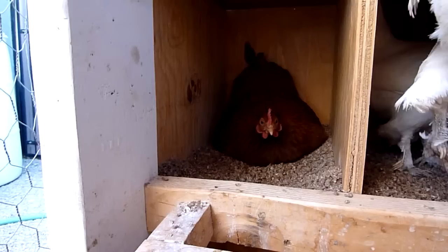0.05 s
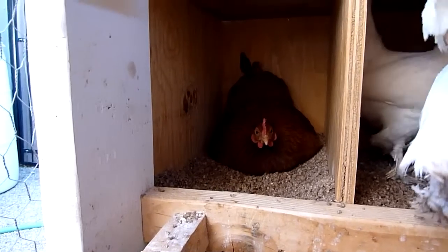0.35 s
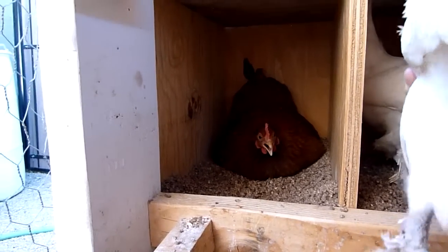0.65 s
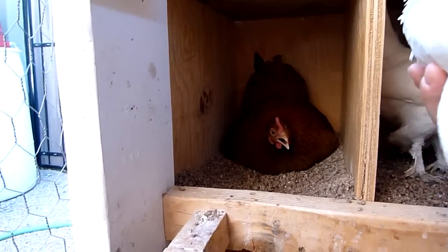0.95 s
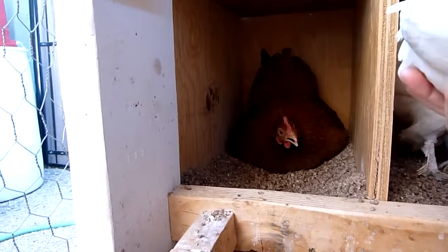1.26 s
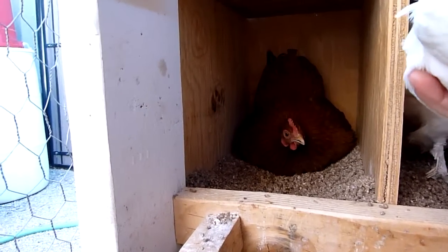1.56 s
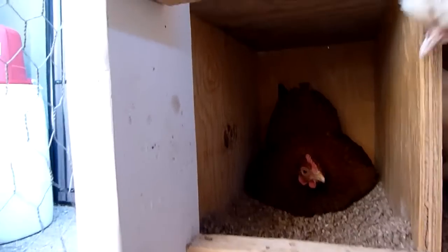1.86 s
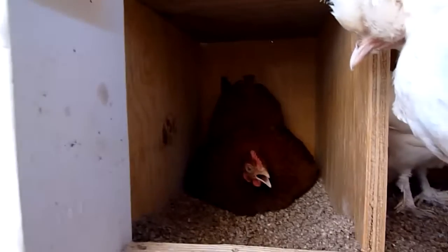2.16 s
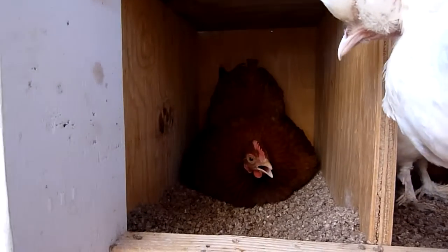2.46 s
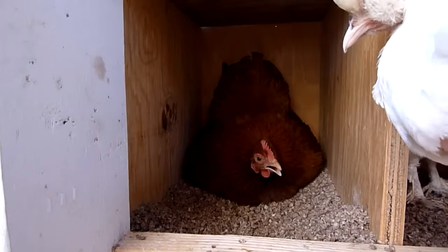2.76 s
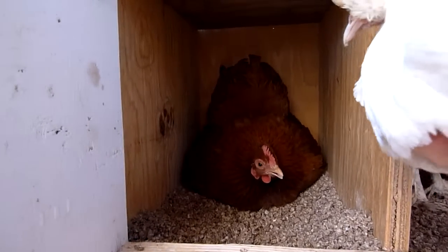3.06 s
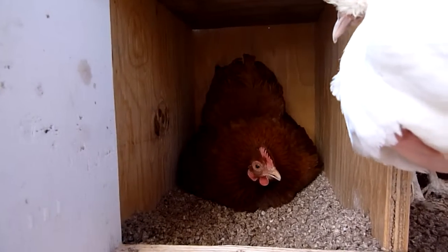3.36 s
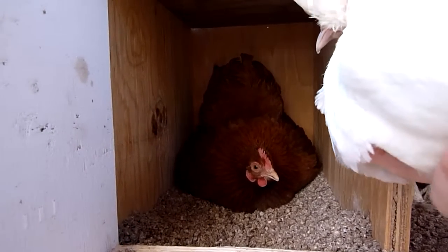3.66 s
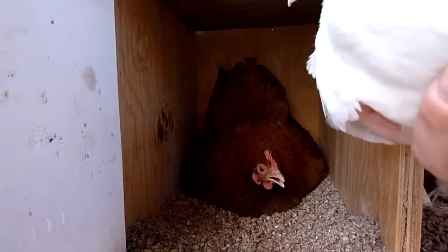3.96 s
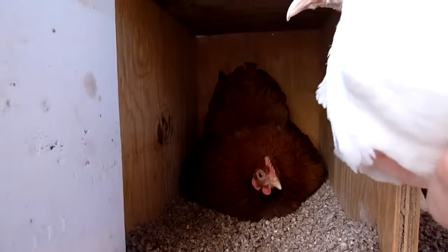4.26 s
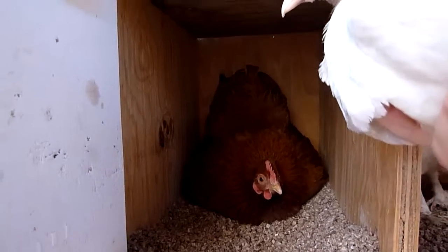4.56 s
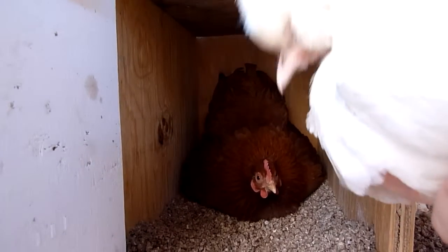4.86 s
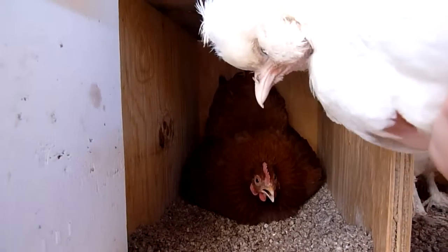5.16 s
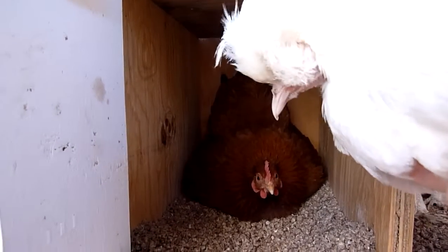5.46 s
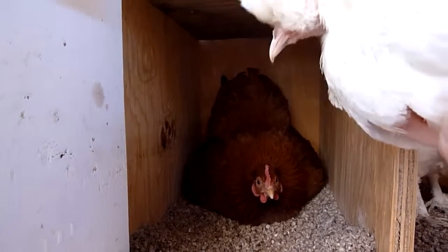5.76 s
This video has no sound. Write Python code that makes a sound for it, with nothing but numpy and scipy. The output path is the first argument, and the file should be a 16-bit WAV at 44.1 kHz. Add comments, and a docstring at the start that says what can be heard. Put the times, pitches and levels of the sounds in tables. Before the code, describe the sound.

Steady airy hiss fills a coop while a hen, close to the microphone, protests from her wooden nest box. First comes a shrill, wobbling squeal, then a longer, raspier one. Quick rattles and brief harsh squawks follow, dropping into a low pulsing growl. After a pause she squawks and growls again, trailing off into clucks. The box gives her voice a slight, tight echo.

```python
"""A broody hen warns an intruder off her plywood nest box, over the hiss and low murmur of coop air.
0.6 s and 1.9 s: two long squeals, a high wobbling syrinx tone that breaks into rasp.
From 3 s: short squawks amid fast rattles of her low voice, whose pitch sags in every throb.
4 s and 5.2 s: two slow, throbbing growls that sink and fade into clucks.
The box adds close echoes throughout."""
import sys
import numpy as np
from scipy import signal
from scipy.fft import rfft, irfft
from scipy.io import wavfile
from scipy.ndimage import uniform_filter1d

SR = 44100
rng = np.random.default_rng(int(sys.argv[2]) if len(sys.argv) > 2 else 0)


def transcribe(u):
    """Save the signal u as a 16-bit wav file named by the first command-line argument.

    u: samples, shape (n,) or (channels, n), limited to [-1, 1]; the rate is SR.
    q: integer samples, one column per channel.
    """
    v = np.clip(np.atleast_2d(u).T, -1, 1)
    q = np.round(v * 32767).astype(np.int16)
    wavfile.write(sys.argv[1], SR, q)


N = 265041
T = np.arange(N) / SR
BIN_HZ = np.fft.rfftfreq(N, 1 / SR)


def squeal(throb_power, throb_hz):
    """High voice: a wobbling syrinx tone, second harmonic on the throat resonance, breaking into rasp."""
    # throat response: (frequency [Hz], gain [dB])
    throat = [(1000, -24), (1700, -4.5), (2250, -9.5), (2700, 4), (3400, 5), (4400, 5.5), (4850, -7),
              (5700, -2.5), (6800, -52), (8400, -10.5), (11000, -41)]
    # bright edge of the rasp: (frequency [Hz], gain [dB])
    edge_spectrum = [(4000, -68), (6800, -45), (7780, -0.5), (8140, 1.5), (8990, -4.5), (9850, -2),
                     (10700, -26), (11200, -16), (13300, -46), (14000, -22), (15800, -20)]
    gate, level_db, pitch_hz, rasp, progress, final_wobble, upper_db, edge_db = cries()
    effort_db = level_db + 20.5  # re an ordinary cry
    wobble = final_wobble * (.15 + .85 * progress)  # the voice loosens
    throat_hz = 3835 + .9 * (pitch_hz - 1970)
    beak_hz = 5792 + 26 * effort_db - 255.4 * progress
    flutter = np.sin(turn(56 * (1 + .28 * waver(40.02))))  # membranes flap near 56 Hz
    # throbs drag a loose squeal down
    drag = throb_power / (throb_power + undb(-32) ** 2) * np.clip(wobble / .047, 0, 1) ** 2
    pitch_hz = pitch_hz + drag * (np.maximum(throb_hz, 1200) - pitch_hz)
    bend = wobble * (flutter + .4015 * waver(145.6)) + .0493 * rasp * waver(677)
    phase = turn(pitch_hz * (1 + bend))
    buzz = undb(-22 * rasp) * np.sin(phase) + sum(np.sin(k * phase) for k in range(2, 6))
    tone = colour(buzz, throat)
    tone = tone / np.sqrt(uniform_filter1d(tone ** 2, size=1300))
    puffs = noise() * (1 + .85 * np.cos(phase))  # one a cycle, ringing the throat
    hoarse = (moving_band(throat_hz, 960) + undb(-12) * resonate(puffs, 2507, 700)
              + undb(-18) * resonate(puffs, 3046, 540))
    upper = moving_band(beak_hz, 690) + undb(-4) * resonate(puffs, 5040, 1400)
    edge = (undb(-4) * moving_band(1.41 * beak_hz, 810) + undb(-2) * unit(colour(puffs, edge_spectrum))
            + undb(-9.5) * resonate(puffs, 11340, 7200))
    treble = undb(upper_db - 10) * rasp ** .5 * upper + undb(edge_db - 9.5) * rasp ** .82 * edge
    treble *= undb(-.45 * effort_db)  # swells less than the main resonance
    push = throb_power + undb(-31) ** 2
    spurts = unit(undb(waver(240))) * (push / uniform_filter1d(push, size=1100)) ** .2
    shake_db = (1.4 * flutter + 2.5 * waver(71)) * np.clip(wobble / .036, 0, 1)
    voice = np.sqrt(1 - rasp) * tone + spurts * (np.sqrt(rasp) * hoarse + treble)
    return gate * (undb(level_db + shake_db) * voice + drone(effort_db, rasp))


def cries(squawk_rise_db=13.5, squawk_rasp=.842, squawk_wobble=.035):
    """Per-sample controls of the high voice, over all squeals and squawks."""
    # one curve a squeal: (time [s], level [dB], pitch [Hz], rasp [0-1])
    squeals = [
        [(0.643, -13, 2130, 0.6), (0.7, -21.5, 2285, 0.16), (0.855, -16.5, 2153, 0.06),
         (0.945, -16.5, 1960, 0.34), (1.055, -22, 2018, 0.15), (1.158, -16, 2045, 0.07), (1.2, -31, 1825, 0.62),
         (1.25, -32, 1785, 0.82)],
        [(1.884, -26.5, 1598, .35), (1.903, -19, 1900, 0.13), (1.925, -24, 2029, 0.14),
         (1.97, -25.5, 2020, .04), (2.06, -15, 2073, 0.51), (2.25, -19, 1750, 0.77), (2.5, -21.5, 1850, 0.85),
         (2.6, -20, 2041, 0.47), (2.92, -19, 1969, .33), (2.965, -21.5, 1730, 0.28), (2.995, -29, 1650, 0.91)],
    ]
    # timbre of each squeal: (final wobble [fraction of pitch], upper resonance [dB], bright edge [dB])
    timbres = [(.066, 1.5, 0), (.024, -0.5, 2)]
    # raspy squawks: (start [s], peak [s], end [s], peak level [dB], fade [dB], pitch [Hz],
    # upper resonance [dB], bright edge [dB])
    squawks = [(2.996, 3.016, 3.18, -28, -4.5, 2310, -1.5, -5.5),
               (3.705, 3.725, 3.77, -31, -6, 1800, -0.5, -2.5),
               (3.852, 3.873, 4.009, -15, -21, 1977, 4.5, -1.5),
               (5.11, 5.16, 5.212, -17, -14.5, 1697, -5.5, -10)]
    curves = list(zip(squeals, timbres))
    for start_s, peak_s, end_s, db, fade_db, hz, upper_db, edge_db in squawks:
        envelope = [(start_s, db - squawk_rise_db), (peak_s, db), (end_s, db + fade_db)]
        curve = [(s, level_db, hz, squawk_rasp) for s, level_db in envelope]
        curves.append((curve, (squawk_wobble, upper_db, edge_db)))
    gate, rows = np.zeros(N), []
    for curve, timbre in curves:
        start_s, end_s = curve[0][0], curve[-1][0]
        gate += uniform_filter1d(1. * ((T > start_s) & (T < end_s)), size=200)
        for row in curve:
            progress = (row[0] - start_s) / (end_s - start_s)
            rows.append((*row, progress, *timbre))
    times_s, *columns = np.transpose(sorted(rows))
    return gate, *(np.interp(T, times_s, column) for column in columns)


def drone(effort_db, rasp, pitch_hz=1185):
    """The low voice joins a hoarse cry: a rough note with a weak half-pitch line, steadier with rasp."""
    phase = turn(pitch_hz * (1 + .09 * (1.1 - rasp) * waver(270)))
    tone = unit(np.sin(phase) + undb(-12) * np.sin(phase / 2))
    hoarse = resonate(noise(), 1315, 400) + undb(-9) * resonate(noise(), 802, 530)
    gain = rasp ** 1.02 * undb(-29.5 + .42 * effort_db + 3.2 * waver(65))
    return gain * (undb(-1.1) * rasp * tone + undb(-2) * hoarse)


def growl(power, pitch_hz):
    """Low voice: five harmonics of an unsteady pitch, with a puff of air in each cycle."""
    # throat response: (frequency [Hz], gain [dB])
    throat = [(300, -21), (500, 4), (650, 12), (850, -6.5), (1200, 10.5), (1500, 4.5), (1750, -55),
              (2050, -11.5), (2700, -4), (4200, -14), (6500, -26)]
    pitch_hz = pitch_hz * (1 + .055 * waver(113.3) + .0503 * waver(324.7))
    phase = turn(pitch_hz)
    order = np.arange(1, 6)[:, None]
    weight = gain_at(order * pitch_hz, throat) * undb(-6 * np.log2(order))
    tone = unit((weight * np.sin(order * phase)).sum(axis=0) / np.sqrt((weight ** 2).sum(axis=0)))
    roughness = unit(undb(1.06 * waver(196)))
    puffs = noise() * (1 + .9 * np.cos(phase))
    # tight, high throbs are hoarser
    hoarse = undb(-6) * (pitch_hz / 800) ** 1.3 * moving_band(680 + .45 * pitch_hz, 726)
    fizz = (undb(-19.5) * resonate(puffs, 5360, 1100) + undb(-20) * resonate(puffs, 4380, 600)
            + undb(-25.5) * resonate(puffs, 2750, 920))
    return np.sqrt(power) * undb(-1) * roughness * (tone + hoarse + fizz)


def throbbing(taut_hz=1480, swoop=.19, snap=.08):
    """Low-voice power and pitch: each throb swings the membranes wider; pitch sags and springs back."""
    # fast runs of throbs: (first beat [s], last beat [s], first level [dB], last level [dB],
    # first pitch [Hz], last pitch [Hz])
    rattles = [(0.926, 0.984, -31, -30, 1375, 1342), (2.764, 2.784, -29, -25.5, 1139, 1120),
               (2.968, 3.002, -31, -27.5, 1321, 1150), (3.02, 3.129, -21.5, -22.5, 933.5, 896),
               (3.148, 3.198, -22, -16.5, 804, 572), (3.712, 3.769, -28, -32, 1091, 1247),
               (3.828, 3.862, -27.5, -21, 700, 698), (3.899, 3.977, -24, -22, 980, 718.5),
               (4.985, 5.004, -28.5, -32, 850.6, 1146), (5.082, 5.136, -36.5, -22, 638, 679.4)]
    # slow, deep runs: columns as in rattles
    growls = [(4.022, 4.222, -17.5, -21.5, 668, 553), (5.231, 5.435, -18.5, -20, 612, 570.8)]
    # single throbs: (time [s], level [dB], half length [s], pitch [Hz])
    clucks = [(0.645, -31.5, .011, 622.6), (1.023, -28.5, 0.0062, 1138), (1.181, -30.5, 0.0094, 920.3),
              (1.234, -22.5, 0.0085, 858.8), (2.91, -27.5, 0.0098, 1305), (3.877, -17.5, 0.011, 947),
              (4.257, -30, 0.0053, 503), (4.966, -25, 0.0055, 838), (5.025, -27, 0.0082, 687),
              (5.154, -18.5, 0.00691, 1103), (5.176, -19.5, .015, 762.6), (5.474, -25.5, 0.0083, 635),
              (5.494, -28, 0.0062, 517), (5.522, -21, 0.013, 503)]
    throbs = [*beats(rattles, rate_hz=54, base_half_s=.0063),
              *beats(growls, rate_hz=19.7, base_half_s=.0112, hurry=.11, lengthen=.35), *clucks]
    power, pull, weighted_hz = np.zeros((3, N))
    for s, db, half_s, hz in throbs:
        span = slice(int((s - 3 * half_s) * SR), int((s + 3 * half_s) * SR))
        age = (T[span] - s) / half_s
        skewed = np.abs(age) * (1 - snap * np.sign(age))  # rise faster than fall
        bump = undb(db) ** 2 * np.exp(-1.75 * skewed ** 2.6)
        sag_hz = np.minimum(hz * (1 + swoop * ((age - .22) ** 2 - .2)), taut_hz)
        power[span] += bump
        pull[span] += bump ** 2
        weighted_hz[span] += bump ** 2 * sag_hz
    rest_pull = undb(-43) ** 4
    return power, (weighted_hz + rest_pull * taut_hz) / (pull + rest_pull)


def beats(runs, rate_hz, base_half_s, hurry=0, lengthen=0):
    """Throbs along sliding runs: (time [s], level [dB], half length [s], pitch [Hz])."""
    for first_s, last_s, first_db, last_db, first_hz, last_hz in runs:
        for progress in np.linspace(0, 1, round((last_s - first_s) * rate_hz) + 1):
            scatter_db, detune = rng.standard_normal(2)
            db = first_db + (last_db - first_db) * progress + scatter_db
            hz = (first_hz + (last_hz - first_hz) * progress) * (1 + .0245 * detune)
            half_s = base_half_s * (1 + lengthen * progress) * 2 ** ((db + 25) / 24)  # louder: longer
            hurried = progress + hurry * progress * (1 - progress)  # slow start, fast end
            yield first_s + (last_s - first_s) * hurried, db, half_s, hz


def hen():
    """Both voices through the windpipe; so small a throat radiates no bass."""
    # windpipe resonances and valleys: (frequency [Hz], gain [dB])
    windpipe = [(1550, -1.5), (1780, -8), (2100, 5), (2500, -4.5), (2650, -8), (2740, -6.5), (2880, -1),
                (3130, -3), (3450, -1.5), (4400, -1), (4720, -6), (5050, 1)]
    power, pitch_hz = throbbing()
    voices = squeal(power, pitch_hz) + growl(power, pitch_hz)
    return colour(butter(voices, 4, 380, "high"), windpipe)


def litter_ticks():
    """Dry, quickly fading scuffs in the litter."""
    # scuffs: (time [s], level [dB], decay [s])
    ticks = [(0.258, -39, 0.016), (1.751, -23.5, 0.0022), (4.627, -51, .015)]
    grit = resonate(noise(), 3200, 15000)
    envelope = sum(undb(db) * (T >= s) * np.exp(-np.abs(T - s) / decay_s) for s, db, decay_s in ticks)
    return butter(grit * envelope, 3, 450, "high")


def nest_box(x, tail_db=-21, t60_s=.21):
    """Close plywood echoes and a short tail; the right channel is slightly later and brighter."""
    # wall echoes: (delay [s], level [dB])
    walls = [(.0017, -21), (.0029, -15.5), (.0046, -43), (.0073, -17)]
    # lag of the right channel: (frequency [Hz], phase [rad])
    right_lag = [(100, 0.67), (700, 0.3), (2400, 0.61), (3500, 0.53), (6600, 0.58), (7700, 1.05),
                 (10500, 1.44), (14000, 1.9)]
    echoes = sum(undb(db) * phase_lag(x, 2 * np.pi * BIN_HZ * s) for s, db in walls)
    near = (x + echoes) * undb(1.71)
    lagged = phase_lag(near, np.interp(BIN_HZ, *np.transpose(right_lag)))
    left = colour(near, [(700, .98), (2400, -.058), (4400, -1.55), (8000, -.13)])
    right = colour(lagged, [(700, .2), (2400, .42), (4400, .24), (8000, 3.5)])
    age_s = T[:SR // 3]
    tails = rng.standard_normal((2, len(age_s))) * undb(-60 * age_s / t60_s) * (age_s > .005)
    tails /= np.sqrt((tails ** 2).sum(axis=1, keepdims=True))
    return np.array([left, right]) + undb(tail_db) * signal.fftconvolve(x[None], tails, axes=1)[:, :N]


def coop_air():
    """Background air: changes colour just before the second squeal, dips during the loudest cries."""
    # air before the change: (frequency [Hz], gain [dB])
    early_spectrum = [(18, -50), (30, -38), (86, -25), (108, -29.5), (271, -0.5), (435, -2.5), (596, -4),
                      (662, 0), (838, -7), (2520, -8), (4490, -10), (6650, -2), (9350, -4), (11500, -16),
                      (15800, -20)]
    # air after it: (frequency [Hz], gain [dB])
    late_spectrum = [(18, -50), (30, -39), (90, -31), (145, -20), (335, -2), (612, -3), (735, -8.5),
                     (1530, -9.5), (1700, -11.5), (2590, -12), (3030, -14.5), (4150, -14.5), (7200, -4),
                     (9350, -9.5), (12800, -12), (15800, -24)]
    # level dips: (start [s], depth [dB], fall [s], recovery [s])
    dips = [(0.62, -5, 0.063, 1.1), (1.98, -14.5, 0.36, 0.45), (3.84, -5, 0.081, .25)]
    late = np.clip((T - 1.72) / .046, 0, 1)
    air = np.sqrt(1 - late) * hiss(early_spectrum, -34.47) + np.sqrt(late) * hiss(late_spectrum, -33.97)
    dip_db = sum(db * np.clip((T - s) / fall_s, 0, 1) * np.exp(-np.maximum(T - s - fall_s, 0) / rise_s)
                 for s, db, fall_s, rise_s in dips)
    return undb(dip_db) * air


def hiss(spectrum, mid_db):
    """Hiss over a wavering murmur; the bass is near centre, the treble wide and leaning right."""
    # stereo width: (frequency [Hz], side gain [dB])
    width = [(60, -4), (130, -13), (300, -18), (700, -4.5), (1400, -4), (3000, -4), (4500, -9.5),
             (8000, -4), (13000, 3)]
    mid = unit(colour(noise(), spectrum))
    side = colour(unit(colour(noise(), spectrum)), width)
    murmur = butter(mid, 2, 700)
    mid = mid + .027 * waver(25) * murmur
    side = side + .085 * murmur - .057 * (mid - murmur)
    return undb(mid_db) * np.array([mid + side, mid - side])


def undb(db):
    """Decibels to gain."""
    return 10 ** (np.asarray(db) / 20)


def unit(x):
    """Scale to rms 1."""
    return x / np.sqrt(np.mean(x ** 2))


def noise():
    """White noise."""
    return rng.standard_normal(N)


def waver(rate_hz):
    """Smooth random drift; rms 1."""
    return unit(butter(noise(), 2, rate_hz))


def turn(hz):
    """Oscillator phase [rad]."""
    return 2 * np.pi * np.cumsum(hz) / SR


def butter(x, order, hz, kind="low"):
    """Maximally flat low- or high-pass."""
    return signal.sosfilt(signal.butter(order, hz, kind, fs=SR, output="sos"), x)


def gain_at(hz, outline):
    """Gain of a (frequency [Hz], gain [dB]) outline."""
    points_hz, db = np.transpose(outline)
    return undb(np.interp(np.log(hz + 1), np.log(points_hz), db))


def colour(x, outline):
    """Filter by a (frequency [Hz], gain [dB]) outline."""
    return irfft(rfft(x) * gain_at(BIN_HZ, outline), N)


def phase_lag(x, lag_rad):
    """Delay each frequency bin by a phase."""
    return irfft(rfft(x) * np.exp(-1j * lag_rad), N)


def resonate(x, hz, width_hz):
    """A resonance applied twice, for steep skirts; rms 1."""
    b, a = signal.iirpeak(hz, hz / width_hz, fs=SR)
    return unit(signal.lfilter(b, a, signal.lfilter(b, a, x)))


def moving_band(hz, width_hz):
    """Noise band with a moving centre; rms 1."""
    baseband = butter(noise() + 1j * noise(), 3, width_hz / 2)
    return unit(np.real(baseband * np.exp(1j * turn(hz))))


def scene():
    """Hen and litter in the box, over the coop air."""
    return coop_air() + nest_box(hen() + litter_ticks())


def record(dry, top_hz=15850):
    """The microphone cuts the top steeply."""
    return signal.sosfilt(signal.ellip(10, .2, 80, top_hz, fs=SR, output="sos"), dry)


dry = scene()
out = record(dry)
transcribe(out)
```